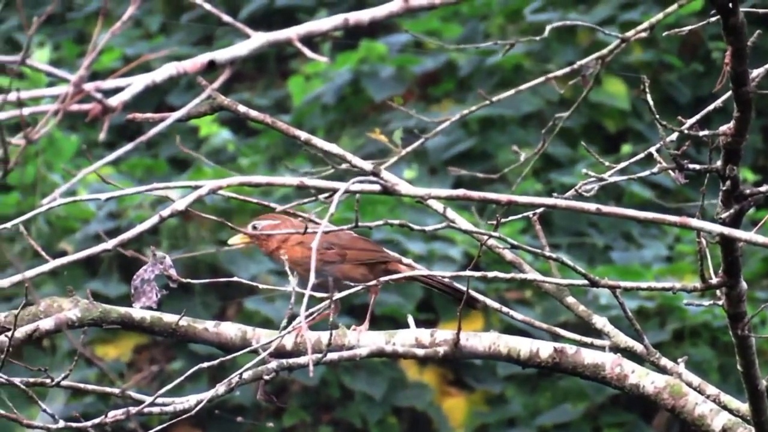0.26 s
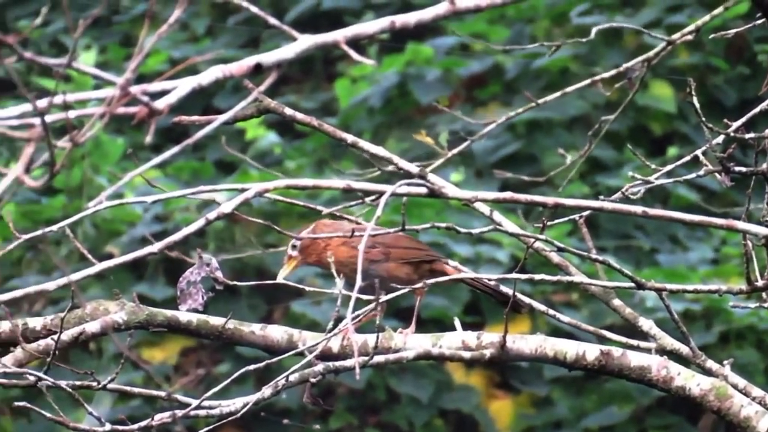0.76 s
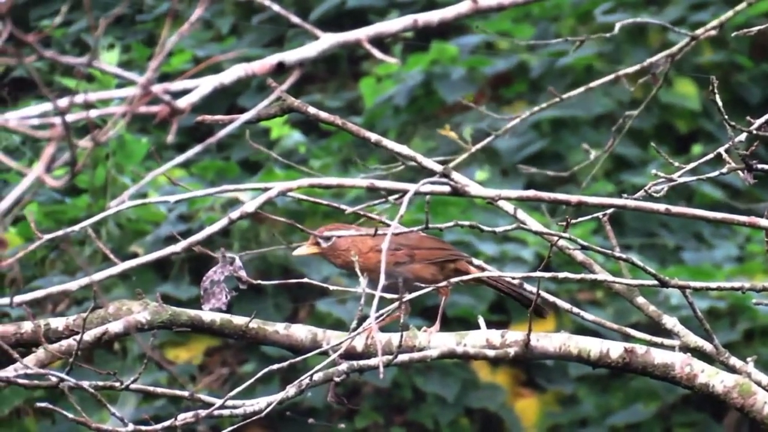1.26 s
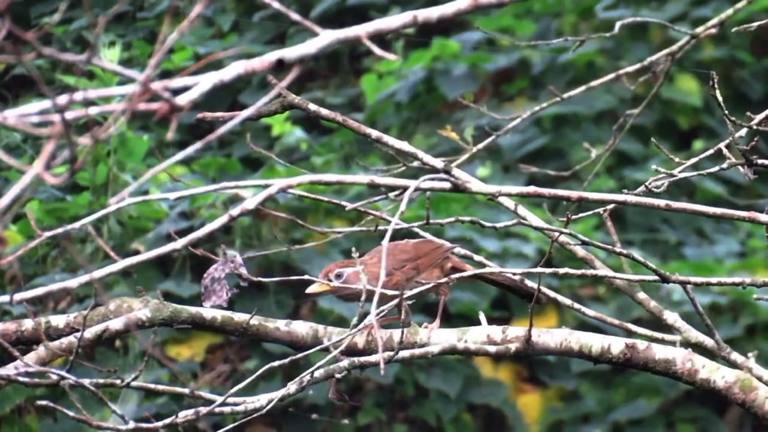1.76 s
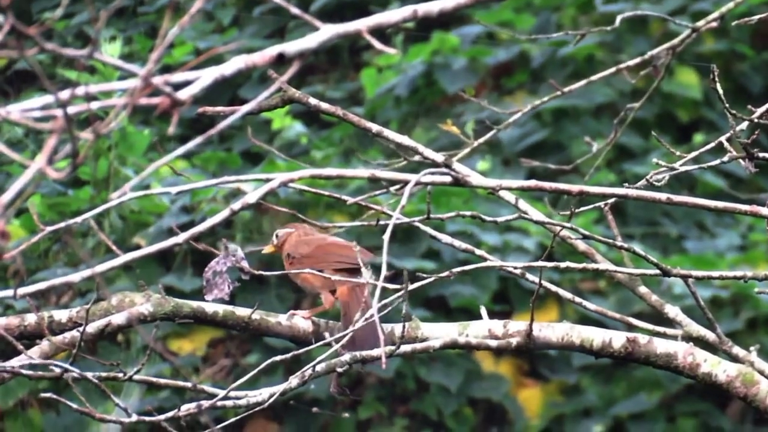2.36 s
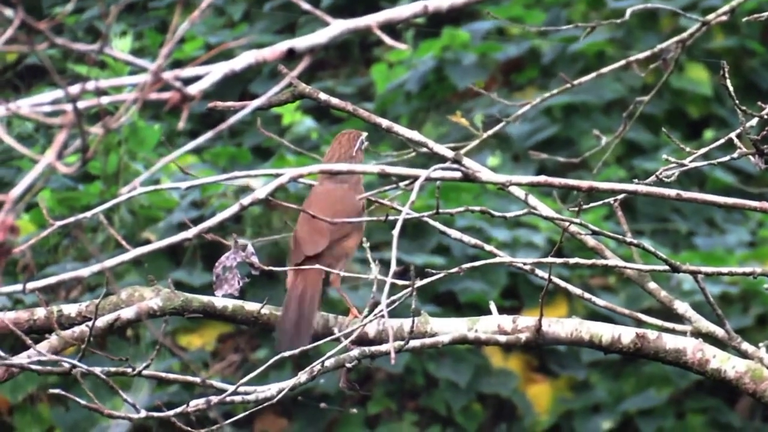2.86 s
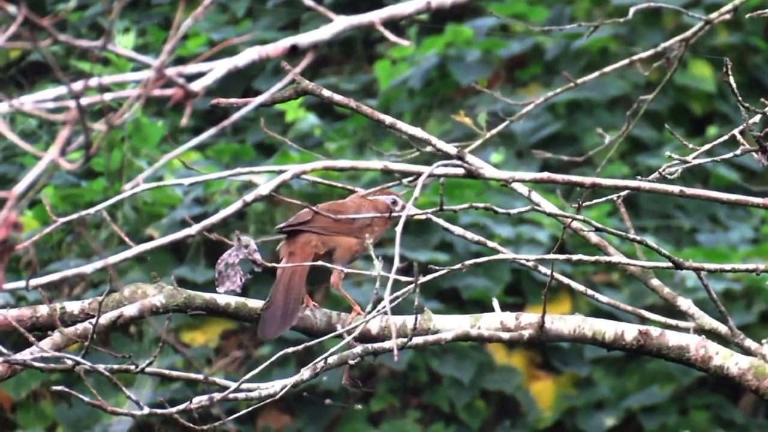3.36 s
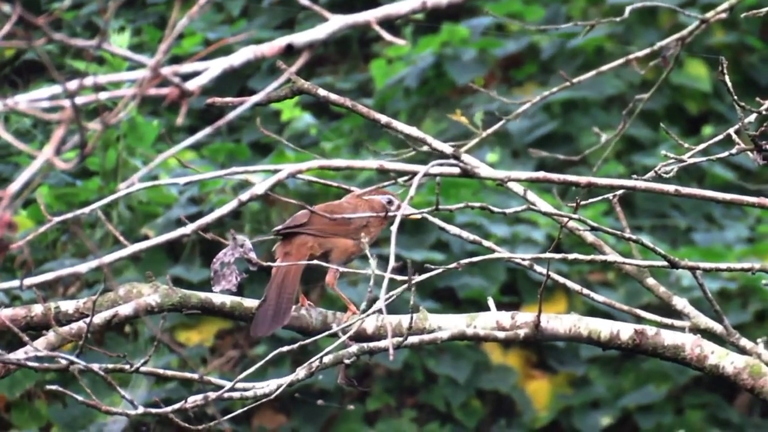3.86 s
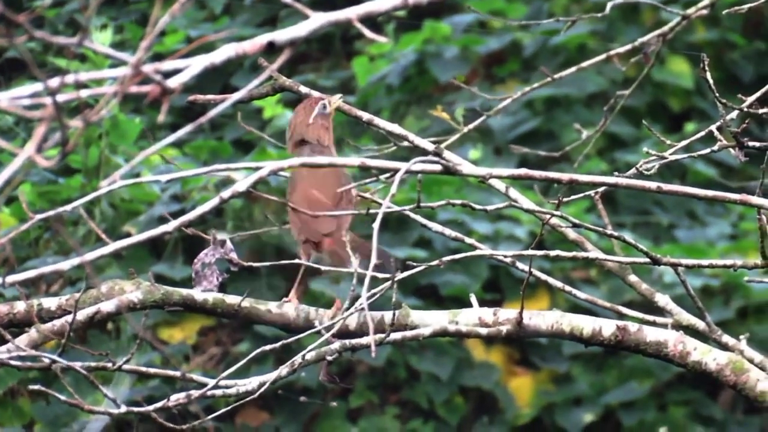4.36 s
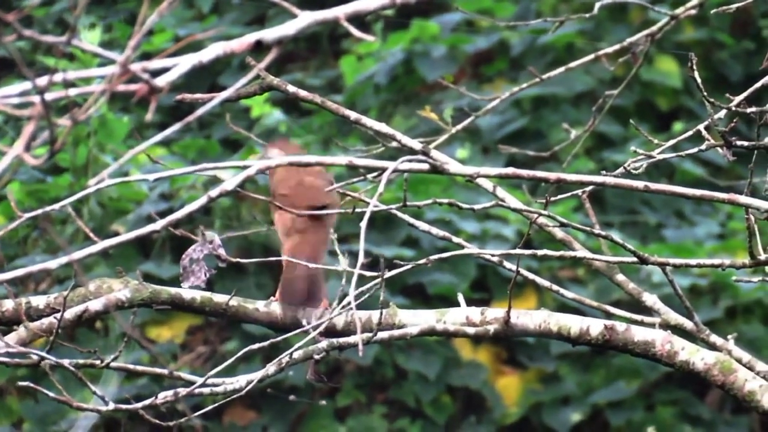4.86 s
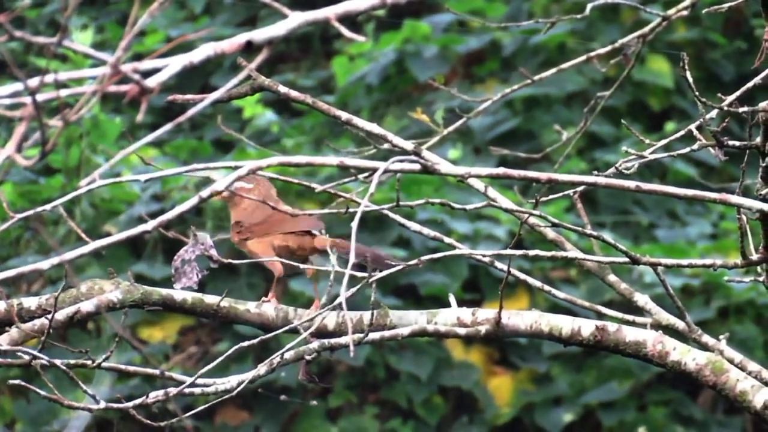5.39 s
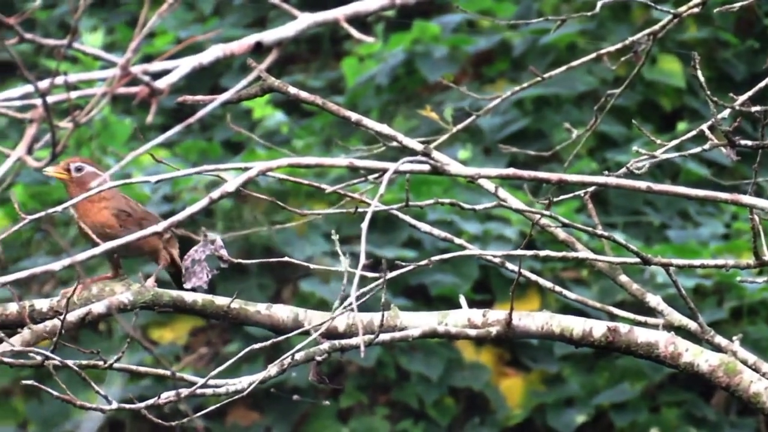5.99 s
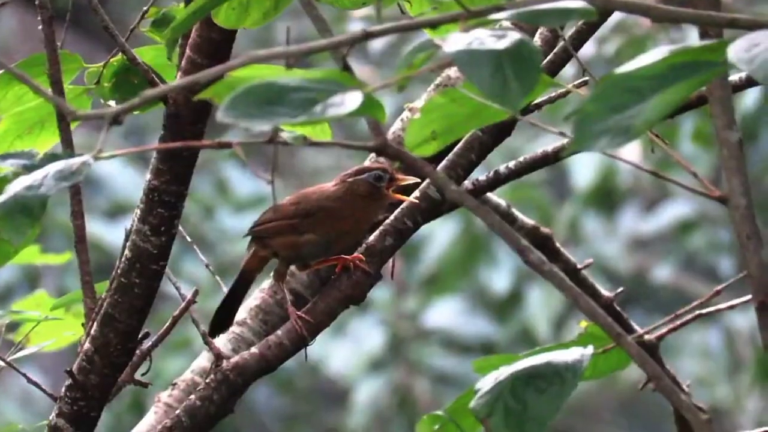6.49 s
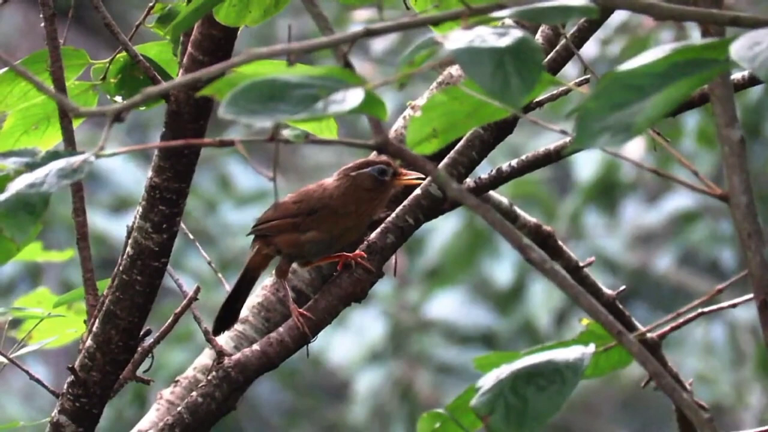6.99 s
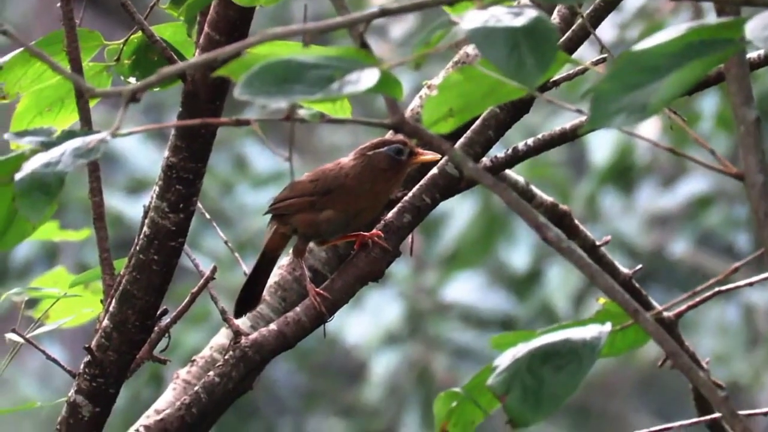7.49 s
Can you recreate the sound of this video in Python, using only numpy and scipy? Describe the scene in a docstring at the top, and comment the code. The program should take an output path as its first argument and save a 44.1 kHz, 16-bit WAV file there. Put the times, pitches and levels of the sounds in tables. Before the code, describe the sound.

Outdoor woodland heard with a central bird fairly near the microphone and wide insect noise around it. One rapid trilled churr opens, three more follow after gaps, along with a short raspy note. Near the end the bird whistles up, high, then low, while a fast insect ticking begins, the hiss grows and a dove coos twice. Faint far birds, soft thumps and light tree echo fill the spaces.

```python
"""A thrush gives four fast-warbled churrs and a low rasp, then three slurred whistles: gliding sines with weak
overtones, frequency-modulated in the churrs, pulsed and hoarse in the rasp. Two insects chirp in doubled wing
strokes and a third starts ticking: short tones sagging in pitch. Distant birds, a faint high insect and a dove
are glides smeared by the forest; low bumps are brief swelling tones. Behind them a cicada chorus, a treble hiss
and the forest air are bands of shaped noise."""
import sys
import numpy as np
from scipy import signal
from scipy.fft import rfft, irfft, next_fast_len
from scipy.io import wavfile
from scipy.ndimage import uniform_filter1d, map_coordinates

SR = 44100
rng = np.random.default_rng(int(sys.argv[2]) if len(sys.argv) > 2 else 0)


def wav_record(signal):
    """Record a signal, one row per channel, as 16-bit PCM in the file named by sys.argv[1]."""
    frames = np.transpose(np.atleast_2d(signal))
    bounded = np.clip(frames, -1, 1)
    # unit amplitude maps onto the largest positive 16-bit level
    quanta = np.round(bounded * 32767).astype(np.int16)
    wavfile.write(sys.argv[1], SR, quanta)


N = 341334

# warble of each churr: (time of one pitch crest [s], rate [1/s], airy noise against the tone [dB])
WARBLE = [(.0655, 49, -32), (3.146, 50, -38), (4.699, 50, -42), (5.801, 50, -25)]
# one path per churr: (time [s], centre pitch [Hz], warble swing [Hz], level [dB])
CHURRS = [
    [(0, 1820, 396, -28), (.026, 1980, 450, -21.5), (.046, 2290, 580, -17), (.086, 2674, 835, -17.5),
     (.108, 2807, 720, -17), (.132, 2607, 454, -18.5), (.154, 2320, 450, -31)],
    [(3.099, 1755, 240, -30), (3.125, 1800, 260, -22.5), (3.146, 2060, 380, -17), (3.167, 2240, 480, -17.5),
     (3.188, 2620, 894, -25), (3.204, 2380, 600, -21)],
    [(4.633, 1660, 220, -32), (4.658, 1780, 233, -21), (4.68, 2035, 286, -17), (4.72, 2330, 330, -14.5),
     (4.731, 2697, 600, -28), (4.746, 2700, 700, -21), (4.754, 2420, 500, -19)],
    [(5.728, 1650, 250, -32), (5.758, 1833, 380, -25), (5.78, 2123, 570, -16), (5.802, 2456, 720, -17.5),
     (5.824, 2520, 700, -18), (5.86, 2400, 450, -16.5), (5.876, 2440, 500, -25)],
]
# path of the rasp: (time [s], pitch [Hz], level [dB])
RASP = [(5.136, 1690, -42), (5.153, 1594, -34), (5.16, 1523, -29), (5.19, 1506, -28), (5.205, 1548, -29),
        (5.22, 1483, -27), (5.28, 1422, -29), (5.325, 1386, -32), (5.34, 1410, -37)]
# throat colour on the hoarse part of the rasp: (frequency [Hz], relative density [dB per Hz])
THROAT = [(900, -32), (1300, -4), (1750, 0), (2150, 1), (2500, -8), (2900, -4), (3300, -14), (5000, -35)]
# one path per whistle: (time [s], pitch [Hz], level [dB])
WHISTLES = [
    [(6.413, 2200, -36), (6.435, 2340, -28), (6.47, 2605, -30.5), (6.52, 2833, -27.5), (6.55, 2890, -38),
     (6.59, 2910, -44)],
    [(6.598, 4060, -38), (6.62, 3933, -29.5), (6.645, 3650, -30), (6.688, 3550, -27.5), (6.72, 3720, -24.5),
     (6.765, 3802, -18), (6.8, 3450, -30.5), (6.84, 3140, -39), (6.87, 3330, -36)],
    [(6.938, 1843, -39.5), (6.99, 1843, -31), (7.035, 1925, -28), (7.07, 1790, -29), (7.1, 1788, -31),
     (7.13, 1956, -29.5), (7.16, 2340, -27.5), (7.2, 2504, -32.5), (7.245, 2424, -48)],
]
GROUND_DELAY_S, GROUND_DB = .0075, -15  # echo of the churrs off the ground

# bouts of the near insect: (time [s], chirps [count], first period [s], level before near_db [dB])
NEAR_BOUTS = [(.358, 4, .1126, -19.5), (1.3435, 4, .1101, -20), (2.074, 4, .1111, -20),
              (2.985, 5, .1083, -20), (4.2295, 6, .1083, -19.5), (5.4445, 6, .1076, -20)]
# bouts of the higher, farther insect: (time [s], chirps [count], first period [s], level before far_db [dB])
FAR_BOUTS = [(.067, 1, .103, -27.5), (.805, 17, .1023, -27), (3.498, 7, .1037, -27), (4.887, 1, .103, -27),
             (5.554, 9, .1041, -27)]
TIRING_S = .00058  # each chirp period in a bout is this much longer than the one before
STROKE_GAP_S = .0143  # between the starts of the two wing strokes of a chirp

# upward flicks of a distant bird: (time [s], length [s], level before flick_gain_db [dB])
FLICKS = [(.7, .02, -48), (.796, .026, -50), (.889, .03, -47.5), (.977, .052, -45.5), (1.788, .026, -51),
          (1.871, .032, -49), (2.116, .06, -47.5), (2.976, .025, -49), (3.055, .03, -51)]
FLICK_FROM_HZ, FLICK_TO_HZ, FLICK_BEND = 1520, 3050, 1.6  # a flick steepens as it climbs
# downward slides just before three held notes: (time [s], level before flick_gain_db [dB])
SLIDES = [(1.268, -45), (2.4, -47), (3.548, -47)]
SLIDE_FROM_HZ, SLIDE_TO_HZ, SLIDE_S = 3200, 1800, .033
# held notes, each ending in a flick; levels before the gains of distant_singers: # (time [s], length [s], first
# pitch [Hz], last pitch [Hz], level [dB], closing flick level [dB])
HELD_NOTES = [(.417, .175, 1450, 2020, -49.5, -42), (1.03, .19, 1650, 2400, -48.5, -52),
              (1.299, .207, 1790, 1780, -46, -46), (1.912, .145, 1540, 1870, -49.5, -43.5),
              (2.219, .15, 1570, 2350, -49, -49), (2.43, .21, 1795, 1840, -43, -45.5),
              (3.385, .12, 1560, 1720, -48, -55), (3.578, .22, 1850, 1900, -44.5, -48),
              (6.031, .158, 1590, 1900, -51.5, -40)]
CLOSING_FLICK_S = .04
# plain, slightly rising notes, the first a faint high insect, the rest of a distant bird: (time [s], length
# [s], middle pitch [Hz], level before held_db [dB])
PIPS = [(.782, .25, 4375, -47.5), (1.164, .095, 3670, -38.5), (2.23, .06, 3690, -39),
        (3.359, .05, 3690, -37.5)]
PIP_RISE_HZ = 70
# harsh buzzes: (time [s], length [s], middle pitch [Hz], level before buzz_db [dB])
BUZZES = [(.28, .2, 2600, -44), (1.05, .18, 2750, -47), (1.24, .13, 2800, -43), (1.94, .17, 2700, -47),
          (2.32, .12, 2950, -44), (3.44, .16, 2650, -42), (4.07, .2, 2350, -49.5), (6.03, .14, 2250, -49),
          (6.41, .12, 2180, -41.5), (7.49, .14, 2150, -43.5)]
BUZZ_RISE_HZ, BUZZ_SWING = 250, .155  # climb, and random pitch shake as a share of the pitch

# coos of the dove, pitches apart from the opening scoop:
# (time [s], length [s], first pitch [Hz], last pitch [Hz], first level [dB], last level [dB])
COOS = [(.68, .27, 410, 404, -59, -63), (2.92, .27, 412, 400, -62, -64), (5.16, .21, 406, 402, -62, -61.5),
        (6.655, .22, 423, 430, -43, -40.5), (7.075, .36, 415, 398, -43.5, -47)]
COO_ATTACK_S, COO_SCOOP_HZ = .025, 20  # each coo slides up into its pitch
# low bumps: (time [s], time scale of the swell [s], pitch [Hz], level [dB], roughness [0-1])
BUMPS = [(0.284, 0.08, 103.5, -30.5, 0.1), (1.059, 0.054, 104, -44.5, .3), (1.446, 0.049, 103, -31, 0.1),
         (1.608, .04, 85, -47, 0.6), (2.32, 0.056, 104, -41, 0.26), (2.624, 0.062, 102, -28.5, 0.18),
         (4.705, 0.045, 99, -38.5, 0.05), (6.331, 0.078, 100.2, -27, 0.2), (6.487, 0.075, 209, -35.5, 0.62)]

# cicada chorus, levels before the group gains:
# (time [s], low group level [dB], middle group level [dB], high group level [dB])
CHORUS = [(0.0, -37, -42, -40), (0.67, -40, -41, -39), (1.4, -38, -40, -40), (1.79, -40, -41, -41),
          (2.41, -37, -41, -40), (2.89, -41, -42, -41), (3.32, -38, -40, -40), (4.01, -41, -42, -40),
          (4.76, -39, -41, -41), (6.38, -40, -40, -39), (6.68, -36, -40, -34), (7.41, -39, -40, -36),
          (7.74, -38, -39, -36)]
# spectrum of each cicada group: (frequency [Hz], relative density [dB per Hz])
LOW_BAND = [(2900, -31), (3300, -12.5), (3550, -1), (3780, 3), (3950, -0.5), (4120, -9), (4500, -47)]
MIDDLE_BAND = [(3800, -43), (4200, -10), (4600, -2), (4850, 1.5), (5150, -2.5), (5500, -11.5), (5900, -35)]
HIGH_BAND = [(5200, -27), (5650, -9.5), (5950, -3), (6280, 1), (6450, -5), (6620, -2.5), (6800, -23),
             (7300, -34)]
# spectrum of the thin treble hiss: (frequency [Hz], relative density [dB per Hz])
HISS = [(6000, -40), (6900, 2), (9500, -0.5), (11000, -1.5), (13300, 2), (15500, -3.5)]
# steady part of the hiss: (time [s], level before hiss_gain_db [dB])
HISS_BED = [(0, -61), (1.8, -63), (4.4, -60), (6.2, -59), (6.5, -56), (7.1, -54), (7.74, -55.5)]
# Gaussian swells of the hiss: (time of the peak [s], standard deviation [s], level before hiss_gain_db [dB])
SWELLS = [(.78, .1, -53), (1.36, .1, -56), (2.25, .16, -51), (3.68, .16, -51), (5.0, .17, -51),
          (6.32, .1, -53)]

# spectrum of the forest air: (frequency [Hz], relative density [dB per Hz])
AIR = [(20, -8), (55, 3), (110, -6), (200, -15), (450, -13), (720, -13), (850, -6.8), (1080, -20.5),
       (1400, -12.5), (2000, -14.5), (3000, -12.6), (7500, -18.5), (8500, -12.5), (9100, -21.5),
       (10200, -21.5), (11000, -46)]
# low rumble of the air: (time [s], level [dB])
RUMBLE = [(0, -66), (1.3, -57), (2.4, -58), (3, -66), (6.3, -67), (6.5, -53.5), (7.74, -56)]
# spectrum of the rumble: (frequency [Hz], relative density [dB per Hz])
RUMBLE_BAND = [(20, -7), (70, 1.5), (130, -10), (250, -13), (500, -17), (1200, -48)]
# left-right coherence of the noise bands: (frequency [Hz], likeness [0-1])
ALIKE = [(60, 1), (250, 0.66), (700, 0.32), (1500, 1), (4000, 1), (7000, 1), (10000, 0.99), (14000, 0.91)]
# reverberation of the trees: (frequency [Hz], decay time t60 [s])
TREES = [(150, 0.72), (1500, 0.52), (2800, 0.66), (6000, 0.36), (12000, 0.19)]
TOP_HZ = 15600  # band limit of the output


def churrs(flutter=.047, trough_db=4.0, peak_share=0.11, rough=0.27):
    """Frequency modulation: the whistle swings some fifty times a second, weakest at each pitch trough."""
    out = np.zeros(N)
    for (crest, rate, airy_db), rows in zip(WARBLE, CHURRS):
        t = span(rows)
        centre, swing, db = curves(rows, t)
        turn = 2 * np.pi * rate * (t - crest)
        warble = np.cos(turn)
        # the second harmonic makes pointed crests and round troughs
        shape = warble + peak_share * np.cos(2 * turn)
        hz = (centre + swing * shape) * (1 + flutter * wobble(900, len(t)))
        effort = amp(db + trough_db * (warble - warble ** 2)) * (1 + rough * wobble(1300, len(t)))
        airy = amp(airy_db) * rng.standard_normal(len(t))
        call = effort * (tone(hz, second_db=-25, third_db=-31, fade=.003) + airy)
        add(out, t[0], call)
        add(out, t[0] + GROUND_DELAY_S, amp(GROUND_DB) * call)
    return forest(beak(out, edge_hz=1290), branches_db=-5.5, trees_db=-15.8, branches_t60=0.099)


def rasp(pulse_rate=125, scatter=0.28, flutter_hz=130, hoarse_db=-8):
    """Amplitude modulation: uneven pulses gate a low note and its hoarse noise together."""
    out, t = np.zeros(N), span(RASP)
    hz, db = curves(RASP, t)
    rate = pulse_rate * (1 + scatter * wobble(116.2, len(t)))
    pulse = np.cos(2 * np.pi * np.cumsum(rate) / SR)
    gate = unit(1 + .65 * pulse)
    voice = tone(hz + flutter_hz * wobble(800, len(t)), second_db=-25, third_db=-32, fade=0.0035)
    hoarse = amp(hoarse_db) * rush(THROAT, patchy_db=1.0)[0, :len(t)]
    add(out, t[0], amp(db) * gate * (voice + hoarse))
    return forest(beak(out, edge_hz=1180), branches_db=-7.5, trees_db=-15, branches_t60=0.025)


def beak(x, edge_hz):
    """High-pass radiation: the open beak radiates almost nothing well below its edge."""
    return signal.sosfilt(signal.butter(6, edge_hz, "highpass", fs=SR, output="sos"), x)


def whistles(waver=0.005):
    """Nearly sinusoidal oscillation: slurred notes with very weak overtones."""
    out = np.zeros(N)
    for rows in WHISTLES:
        t = span(rows)
        hz, db = curves(rows, t)
        # averaging over 800 samples rounds the corners of the pitch path
        hz = uniform_filter1d(hz, size=800) * (1 + waver * wobble(154, len(t)))
        add(out, t[0], amp(db) * tone(hz, second_db=-29, third_db=-44, fade=0.0024))
    return forest(out, branches_db=-8.5, trees_db=-12.5, branches_t60=0.13)


def chirpers(first_db=-1.4, near_db=1, far_db=1):
    """Paired pulses: each chirp of two insects is a weaker wing stroke followed by a stronger one."""
    near, far = np.zeros(N), np.zeros(N)
    for s, db in chirp_times(NEAR_BOUTS):
        first = stroke(start_hz=5320, end_hz=4840, length=0.0085, fade=0.0017, second_db=-26.5)
        second = stroke(start_hz=5355, end_hz=4787, length=0.0091, fade=0.0021, second_db=-29)
        add(near, s, amp(db + near_db + first_db) * first)
        add(near, s + STROKE_GAP_S, amp(db + near_db) * second)
    for s, db in chirp_times(FAR_BOUTS):
        for start, drop_db in ((s, first_db), (s + STROKE_GAP_S, 0)):
            sound = stroke(start_hz=5580, end_hz=5280, length=0.0084, fade=0.0026,
                           second_db=-39, third_db=-50, burst_db=-40)
            add(far, start, amp(db + far_db + drop_db) * sound)
    return forest(near + far, branches_db=-13, trees_db=-32, branches_t60=.025)


def stroke(start_hz, end_hz, length, fade, second_db, third_db=-42, burst_db=-24, burst_s=.003):
    """Tone with a noise onset: a brief decaying burst of noise opens a short tone that sags in pitch."""
    size = int(length * SR)
    sag = np.linspace(start_hz, end_hz, size)
    hz = sag + 25 * rng.standard_normal() + 30 * wobble(1000, size)
    decay = np.exp(-np.arange(size) / (burst_s * SR))
    noise_burst = amp(burst_db) * rng.standard_normal(size) * decay
    return (tone(hz, second_db, third_db, fade) + noise_burst) * amp(0.63 * wobble(730, size))


def chirp_times(bouts):
    """Slowing rhythm: (time [s], level [dB]) of every chirp, the period growing evenly in a bout."""
    return [(s + k * period + TIRING_S * k * (k - 1) / 2, db)
            for s, count, period, db in bouts
            for k in range(round(count))]


def ticker(level_db=-27, start_hz=6640, sag_hz=560, length=0.016):
    """Periodic pulse train: a third insect's high strokes, each sagging as the wing stops."""
    out, u = np.zeros(N), np.linspace(0, 1, int(length * SR))
    for s in np.arange(6.4235, N / SR, .04342):  # start and period in seconds
        hz = start_hz - sag_hz * u ** 4 + 30 * wobble(840, len(u))
        level = amp(level_db + rng.normal(0, 0.59))
        add(out, s, level * tone(hz, second_db=-33, third_db=-60, fade=0.007))
    return out


def distant_singers(flick_gain_db=-1.3, held_db=-0.4, buzz_db=-2.1, flick_swing=.016, held_swing=.032, pip_swing=.012):
    """Multiple scattering: flicks, slides, held notes, pips and buzzes of distant birds, and a faint high
    insect note, arrive blurred by the trees."""
    quick, held, harsh = np.zeros((3, N))
    for s, length, db in FLICKS:
        hz = glide(FLICK_FROM_HZ, FLICK_TO_HZ, length, FLICK_BEND)
        add(quick, s, far_note(hz, db, flick_swing, fade=.003))
    for s, db in SLIDES:
        hz = glide(SLIDE_FROM_HZ, SLIDE_TO_HZ, SLIDE_S)
        add(quick, s, far_note(hz, db, flick_swing, fade=.004))
    for s, length, first, last, db, flick_db in HELD_NOTES:
        hz = glide(first, last, length, bend=1.2)
        flick_hz = glide(last, FLICK_TO_HZ, CLOSING_FLICK_S, FLICK_BEND)
        add(held, s, far_note(hz, db, held_swing, fade=.008))
        add(quick, s + length, far_note(flick_hz, flick_db, flick_swing, fade=.004))
    for s, length, middle, db in PIPS:
        hz = middle + PIP_RISE_HZ * glide(-.5, .5, length)
        add(held, s, far_note(hz, db, pip_swing, fade=.015))
    for s, length, middle, db in BUZZES:
        hz = middle + BUZZ_RISE_HZ * glide(-.5, .5, length)
        add(harsh, s, far_note(hz, db, BUZZ_SWING, fade=.02))
    return (amp(flick_gain_db) * forest(quick, branches_db=-7, trees_db=-6, branches_t60=.1)
            + amp(held_db) * forest(held, branches_db=-6, trees_db=-5, branches_t60=.1)
            + amp(buzz_db) * forest(harsh, branches_db=-4.5, trees_db=-3, branches_t60=.1))


def far_note(hz, db, swing, fade, grain_db=2):
    """Random modulation: one distant note, unsteady in pitch and level."""
    shaken = hz * (1 + swing * wobble(600, len(hz)))
    level = amp(db + grain_db * wobble(120, len(hz)))
    return level * tone(shaken, second_db=-25, third_db=-50, fade=fade)


def dove():
    """Nearly pure tone: soft coos that relax exponentially up into their pitch."""
    out = np.zeros(N)
    for s, length, first, last, first_db, last_db in COOS:
        hz = glide(first, last, length)
        hz = hz - COO_SCOOP_HZ * np.exp(-np.arange(len(hz)) / (COO_ATTACK_S * SR))
        coo = tone(hz, second_db=-34, third_db=-42, fade=COO_ATTACK_S)
        add(out, s, amp(glide(first_db, last_db, length)) * coo)
    return forest(out, branches_db=-22, trees_db=-15, branches_t60=.08)


def bumps(waver=.06, thud_hz=48, thud_db=-13):
    """Transient oscillation: a few low cycles with rattle and a deeper thud swell and die away."""
    out = np.zeros(N)
    for s, length, hz, db, rough in BUMPS:
        u = np.arange(int(2 * length * SR)) / (length * SR)
        swell = u ** 2 * np.exp(-(u / 0.38) ** 1.46)
        ring = tone(hz * (1 + waver * wobble(137, len(u))), second_db=-29, third_db=-30, fade=.003)
        rattle = 1 - rough + rough * wobble(1.5 * hz, len(u))
        thud = amp(thud_db) * unit(np.sin(2 * np.pi * thud_hz * length * u))
        add(out, s, amp(db) * swell / swell.max() * (ring * unit(rattle) + thud))
    return out


def cicadas(low_gain_db=0.8, middle_gain_db=1.4, high_gain_db=1.2, hiss_gain_db=2.4, shimmer_db=0.73):
    """Incoherent summation: many cicadas merge into three noise bands under a swelling hiss."""
    t = np.arange(N) / SR
    low, middle, high = curves(CHORUS, t)
    groups = ((low + low_gain_db, LOW_BAND),
              (middle + middle_gain_db, MIDDLE_BAND),
              (high + high_gain_db, HIGH_BAND))
    drone = sum(amp(db + shimmer_db * wobble(60, N)) * rush(band, patchy_db=1) for db, band in groups)
    bed_db, = curves(HISS_BED, t)
    swells = sum(amp(db) * np.exp(-((t - s) / width) ** 2 / 2) for s, width, db in SWELLS)
    hiss_level = amp(hiss_gain_db) * np.hypot(amp(bed_db), swells)  # powers add
    return drone + hiss_level * rush(HISS, patchy_db=1.3)


def air(air_db=-47.6):
    """Broadband noise: the faint wash of the forest over a low rumble."""
    rumble_db, = curves(RUMBLE, np.arange(N) / SR)
    return amp(air_db) * rush(AIR, patchy_db=1.25) + amp(rumble_db) * rush(RUMBLE_BAND, patchy_db=1)


def forest(x, branches_db, trees_db, branches_t60):
    """Reverberation: nearby branches scatter a quick smear, the trees behind return a long tail."""
    hz, t, z = signal.stft(rng.standard_normal(SR), SR, nperseg=256)
    decay = amp(-60 * t / along(TREES, hz)[:, None])
    tail = signal.istft(z * decay, SR, nperseg=256)[1][:SR]
    t = np.arange(SR) / SR
    tail = tail * (1 - np.exp(-t / 0.016))  # the tail builds up gradually
    smear = rng.standard_normal(SR) * amp(-60 * t / branches_t60) * (t > .003)
    echo = amp(branches_db) * smear / np.linalg.norm(smear) + amp(trees_db) * tail / np.linalg.norm(tail)
    return x + signal.fftconvolve(x, echo)[:N]


def rush(spectrum, patchy_db):
    """Partial coherence: stereo noise of rms 1, shaped in frequency, with patches of random gain."""
    z = signal.stft(rng.standard_normal((2, N)), nperseg=512)[2]
    field = uniform_filter1d(rng.standard_normal(z.shape[1:]), size=5, axis=0)  # across frequency
    field = uniform_filter1d(field, size=10, axis=1)  # along time
    pair = signal.istft(z * amp(patchy_db * unit(field)), nperseg=512)[1][:, :N]

    def mid_side(hz):
        """Coherence as an angle: the cosine of twice the turn is the left-right likeness."""
        turn = np.arccos(np.clip(along(ALIKE, hz), 0, 1)) / 2
        return amp(along(spectrum, hz)) * [np.cos(turn), np.sin(turn)]

    mid, side = filtered(pair, mid_side)
    return unit(np.array([mid + side, mid - side]))


def tone(hz, second_db, third_db, fade):
    """Harmonic series: a gliding sine of rms 1 before fading, with two overtones and faded ends."""
    phase = 2 * np.pi * np.cumsum(hz) / SR
    wave = np.sin(phase) + amp(second_db) * np.sin(2 * phase) + amp(third_db) * np.sin(3 * phase)
    return np.sqrt(2) * wave * signal.windows.tukey(len(hz), min(1, 2 * fade * SR / len(hz)))


def glide(first, last, length, bend=1):
    """Power-law path between two values: a bend above 1 saves most of the change for the end."""
    return first + (last - first) * np.linspace(0, 1, int(length * SR)) ** bend


def wobble(rate, size):
    """Band-limited randomness: a smooth random curve with rate knots a second."""
    knots = rng.standard_normal(int(size * rate / SR) + 4)
    return map_coordinates(knots, [np.arange(size) * rate / SR])


def filtered(x, response):
    """Linear filtering: the spectrum of x times a response of frequency."""
    m = next_fast_len(N + SR // 2)
    return irfft(rfft(x, m) * response(np.fft.rfftfreq(m, 1 / SR)), m)[..., :N]


def amp(db):
    """Level law: decibels to amplitude gain."""
    return 10 ** (np.asarray(db) / 20)


def unit(x):
    """Normalization: scale to rms 1."""
    return x / np.sqrt(np.mean(x ** 2) + 1e-20)


def along(points, hz):
    """Logarithmic frequency scale: (frequency [Hz], value) points interpolated at hz."""
    f, v = np.transpose(points)
    return np.interp(np.log(hz + 1), np.log(f + 1), v)


def curves(rows, t):
    """Linear interpolation: each column after the time, read at times t."""
    s, *cols = np.transpose(rows)
    return [np.interp(t, s, c) for c in cols]


def span(rows):
    """Sampling: sample times from the first row to the last."""
    return np.arange(rows[0][0], rows[-1][0], 1 / SR)


def add(track, s, sound):
    """Superposition: mix a sound into a track at time s."""
    i = max(round(s * SR), 0)
    track[i:i + len(sound)] += sound[:max(N - i, 0)]


def scene():
    """Superposition: singers and bumps straight ahead, in the wider cicada chorus and forest air."""
    singers = churrs() + rasp() + whistles() + chirpers() + ticker() + distant_singers() + dove()
    return singers + bumps() + cicadas() + air()


def record(dry):
    """Band limitation: nothing at or above the band limit is kept."""
    return filtered(dry, lambda hz: hz < TOP_HZ)


dry = scene()
out = record(dry)
wav_record(out)
```